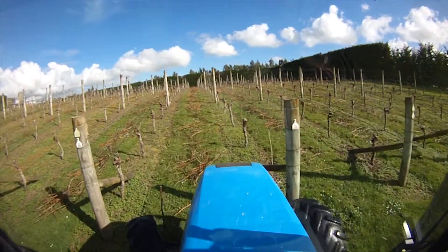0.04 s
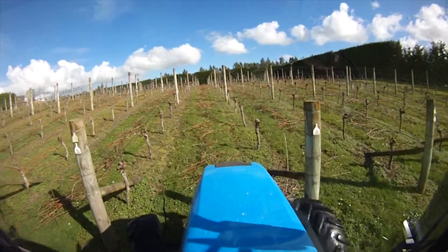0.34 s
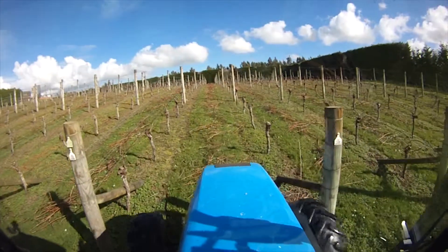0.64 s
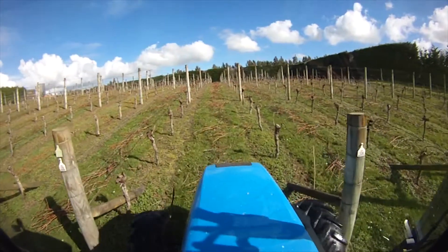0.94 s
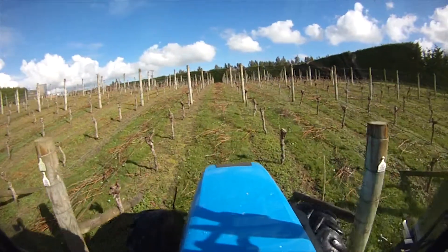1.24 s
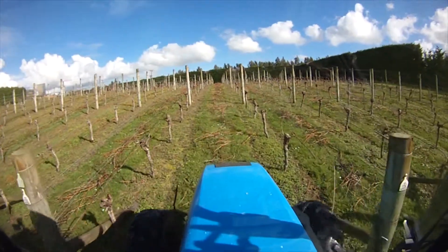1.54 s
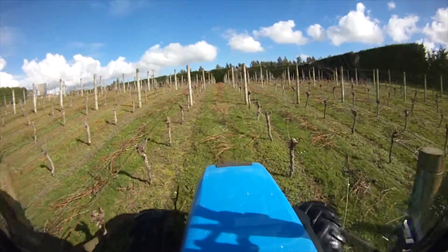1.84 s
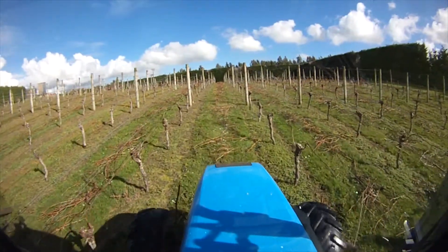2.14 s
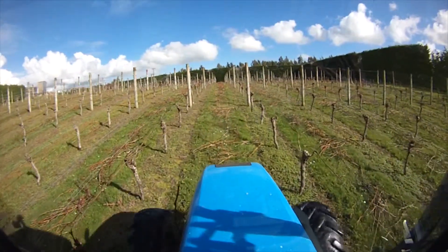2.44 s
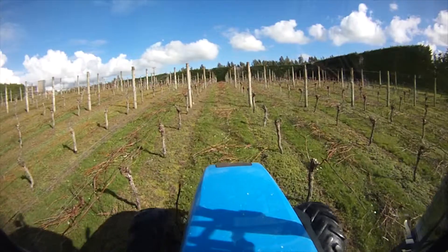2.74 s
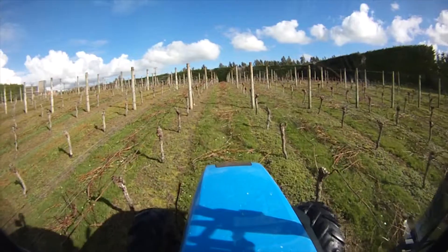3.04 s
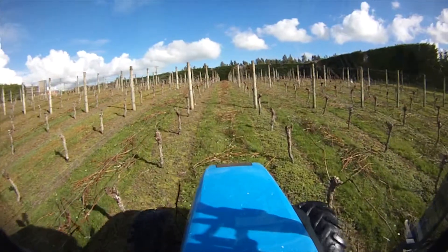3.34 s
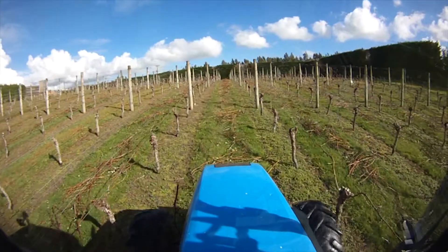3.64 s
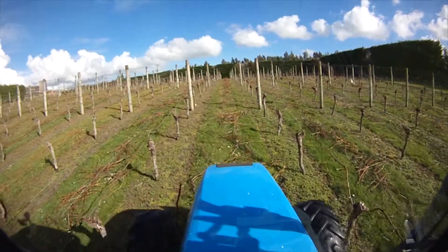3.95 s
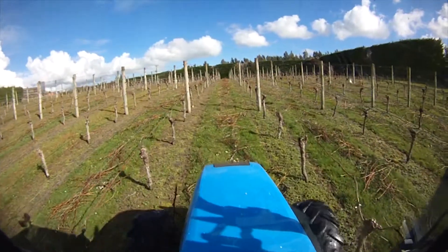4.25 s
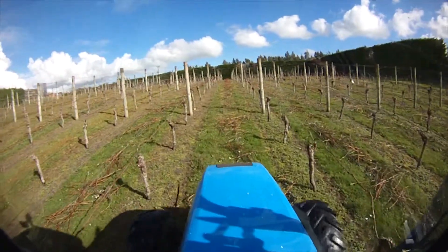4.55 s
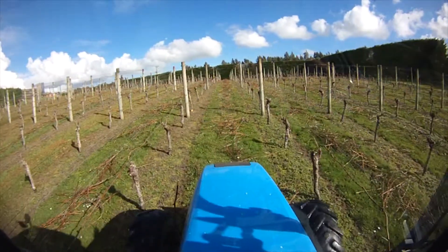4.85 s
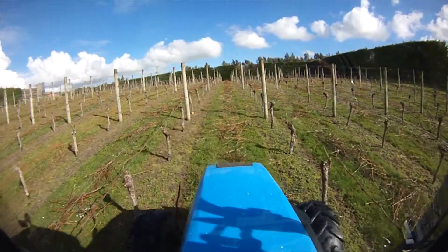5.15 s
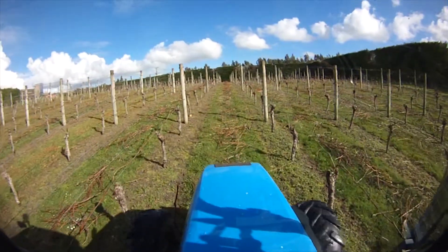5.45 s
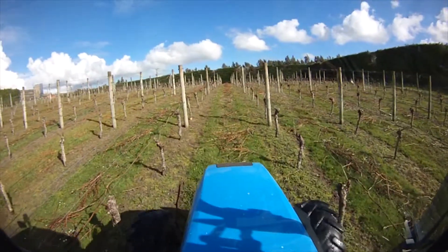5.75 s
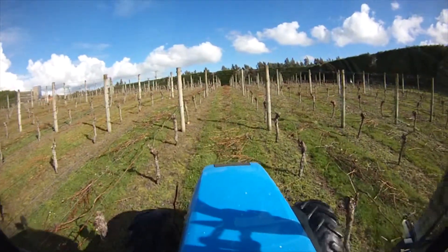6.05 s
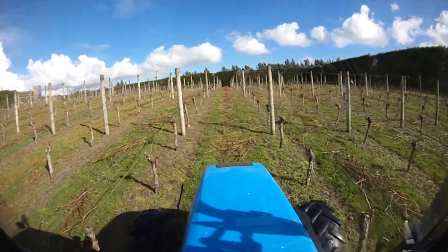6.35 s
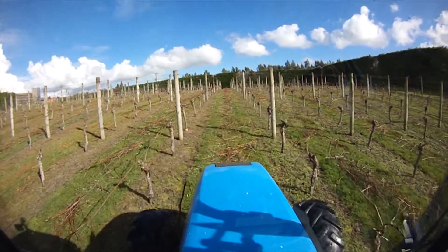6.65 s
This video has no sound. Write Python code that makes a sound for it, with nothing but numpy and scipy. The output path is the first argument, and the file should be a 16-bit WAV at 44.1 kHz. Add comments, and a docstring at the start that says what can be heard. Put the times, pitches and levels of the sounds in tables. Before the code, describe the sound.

A diesel tractor drones and roars steadily, heard from the seat, while a mulcher behind hums and shreds cuttings with occasional thumps and snaps.

```python
"""A diesel tractor drones and roars along a vineyard row, heard from the driver's seat.
Its four cylinders repeat one pattern of tones, with fan and gear tones in between.
Behind it a mulcher shreds cuttings with swinging blades (flails); its hum beats against the engine.
The roar rings the bodywork and swells as the flails bite; canes thump and twigs snap.
For the first three seconds the tractor steers into the row: gears whine and a panel buzzes more."""
import sys
import numpy as np
from scipy import signal
from scipy.fft import rfft, irfft
from scipy.io import wavfile

SR = 44100
rng = np.random.default_rng(int(sys.argv[2]) if len(sys.argv) > 2 else 0)


def master(y):
    """Save y as 16-bit WAV."""
    cut = np.clip(np.atleast_2d(y).T, -1, 1)
    pcm = np.round(cut * 32767)  # scale
    wavfile.write(sys.argv[1], SR, pcm.astype(np.int16))


N = 299439
TIME = np.arange(N) / SR
FREQ = np.fft.rfftfreq(N, 1 / SR)

# One engine cycle is two turns of the crank. An "order" is a multiple of the cycle rate.
# engine tones (order, base level [dB])
ENGINE_TONES = [(4, -56.5), (7, -48.5), (10, -53.5), (11, -49), (12, -43.5), (13, -41.5), (14, -44.5),
                (15, -33), (16, -49.5), (17, -55.5), (21, -62.5), (22, -60.5), (27, -57.5), (29, -64),
                (31, -58), (32, -43), (33, -67.5), (37, -65.5), (38, -58), (42, -61.5), (46, -65.5),
                (55, -70), (56, -63), (59, -66), (224, -94)]
# timing gear tones, around 24 teeth meeting per cycle (order, base level [dB])
GEAR_TONES = [(23, -58.5), (24, -40.5), (25, -49.5)]
# higher gear tones (order, level against the strongest [dB])
HIGH_GEAR_TONES = [(48, 0), (49, -8), (104, -13)]
# tone colour of the roar of engine and mulcher (frequency [Hz], base level [dB per Hz])
ROAR_COLOUR = [(15, -96), (40, -88), (70, -87.5), (112, -81), (142, -63), (200, -68), (335, -61),
               (395, -73.5), (710, -73.5), (790, -80.5), (1050, -82.2), (1400, -87), (2200, -91.2),
               (2900, -104.7), (5000, -125), (12000, -150)]
WHISTLE_ORDER = 64  # 16 times the firing rate


def undb(db):
    """Turn decibels into a gain."""
    return 10 ** (np.asarray(db) / 20)


def wander(rate_hz):
    """A smooth random wobble with a spread of 1, moving about rate_hz times a second."""
    wobble = irfft(rfft(rng.standard_normal(N)) / (1 + (FREQ / rate_hz) ** 4), N)
    return wobble / wobble.std()


def curve(table):
    """Join (time, value) points with straight lines."""
    return np.interp(TIME, *np.transpose(table))


def lows(sound, top_hz):
    """The part of a sound below top_hz."""
    return irfft(rfft(sound) / (1 + (FREQ / top_hz) ** 8), N)


def hold(end_s, release_s):
    """Stay at 1 until end_s, then fall to 0."""
    return np.clip(1 - (TIME - end_s) / release_s, 0, 1)


def step_up(start_s=1.468, attack_s=0.023):
    """The sound steps up suddenly near 1.5 s, holds, and eases back after 3.5 s (0 to 1)."""
    return np.clip((TIME - start_s) / attack_s, 0, 1) * hold(end_s=3.52, release_s=0.75)


def follow_db(swell_db, rest_db, share, steer_db):
    """A sound's level change: a share of the overall swell, plus a lift while the tractor steers."""
    return rest_db + share * swell_db + steer_db * hold(end_s=2.9, release_s=0.47)


def bites():
    """The flails bite into cuttings: brief swells in loudness, with rattle and hiss rising or dipping."""
    # (peak time [s], half-length [s], swell [dB], rattle change [dB], hiss change [dB])
    heaps = [(0.114, 0.17, 3, -1.5, 0.5), (1.557, 0.097, 2.1, 0, 0.5), (1.818, 0.13, 4, 10, -0.8),
             (2.44, 0.19, 4, 1, 1.5), (3.494, 0.11, 2, -6, 1), (4.608, 0.072, 4, 4, -0.5),
             (5.47, 0.1, 3, -4.5, 0), (6.179, 0.16, 2.5, -3, 0.5), (6.763, 0.092, 2.5, 16.5, 3.5)]
    bumps = np.array([np.exp(-((TIME - s) / length) ** 2) for s, length, *_ in heaps])
    return np.array(heaps)[:, 2:].T @ bumps


def through_body(sound, colour):
    """Give a sound a tone colour and the ring of the tractor's panels and pipes."""
    # peaks and dips of the bodywork (frequency [Hz], width [Hz], lift [dB])
    resonances = [(447, 16, 4.5), (507, 21, 6), (638, 37, -6), (710, 86, 4), (720, 39, 3), (870, 44, 5.5),
                  (1043, 7.2, -5.5), (1320, 94, 1.5), (1503, 110, 4.5), (2010, 38, 4), (2420, 58, -6.5),
                  (2756, 6.2, 13), (4110, 190, 5.5), (4790, 56, 6.5), (5300, 200, -1), (5480, 180, 4),
                  (6060, 120, 3), (6740, 120, 3.5), (8780, 77, 4)]
    hz, db = np.transpose(colour)
    gain_db = np.interp(np.log(FREQ + 1), np.log(hz), db)
    for centre, width, lift in resonances:
        gain_db = gain_db + lift / (1 + (2 * (FREQ - centre) / width) ** 2)
    return irfft(rfft(sound / sound.std()) * undb(gain_db), N) * np.sqrt(SR / 2)


def shaft_tones(turns, tones, level_db):
    """Tones at multiples of a shaft's speed, each wavering by about 1 dB on its own."""
    return sum(undb(db + level_db + wander(1.9)) * np.cos(2 * np.pi * (order * turns + rng.random()))
               for order, db in tones)


def steering_pump(cycle, swell_db):
    """The steering pump sings louder while the wheels are turned."""
    # (order, base level [dB])
    tones = [(62.17, -65), (63.086, -63), (65, -65), (65.82, -60), (69, -65)]
    return shaft_tones(cycle, tones, follow_db(swell_db, rest_db=-11, share=0.42, steer_db=10.4))


def whistle(cycle):
    """A thin whistle whose pitch follows the engine speed."""
    # (time [s], level [dB])
    levels = [(0, -58), (1.2, -59), (1.7, -62), (2.1, -65.5), (3.05, -55.5), (3.5, -65), (4.3, -61.5),
              (6.6, -61), (6.76, -61)]
    return undb(curve(levels)) * np.cos(2 * np.pi * WHISTLE_ORDER * cycle)


def loose_panel(cycle, swell_db, rattle_db, ring_hz=1390, width_hz=65):
    """A loose panel is jolted once a cycle and buzzes."""
    jolts = rng.standard_normal(N) * (1 + 0.093 * np.cos(2 * np.pi * cycle)) ** 2
    ring = irfft(rfft(jolts) / (1 + (2 * (FREQ - ring_hz) / width_hz) ** 4), N)
    buzz_db = follow_db(swell_db, rest_db=-70, share=0.1, steer_db=7.2)
    return ring / ring.std() * undb(buzz_db + rattle_db)


def transmission(cycle, swell_db):
    """The drive to the wheels whines, more so while steering."""
    # (order, base level [dB])
    tones = [(26.248, -65), (31.088, -55), (31.542, -63), (32.459, -59), (32.91, -59), (33.824, -60),
             (52.495, -68)]
    return shaft_tones(cycle, tones, follow_db(swell_db, rest_db=-5.5, share=0.82, steer_db=6.2))


def fan(cycle, swell_db, turns_per_cycle=2.4345):
    """The cooling fan hums, driven by a belt from the engine."""
    # (multiple of the fan's turn rate, base level [dB])
    tones = [(4, -60), (5, -59), (8, -61), (9, -56), (10, -52), (11, -63), (12, -58), (14, -53.5)]
    level_db = follow_db(swell_db, rest_db=-2.7, share=0.76, steer_db=1.2)
    return shaft_tones(turns_per_cycle * cycle, tones, level_db)


def gears(cycle):
    """Gear teeth sing as they meet; the whine grows when the wheels push harder."""
    # main whine (time [s], level change [dB])
    whine = [(0, -2), (1.2, -0.5), (1.7, 4.8), (2.05, 0), (2.25, 3.5), (2.47, 6.5), (2.75, 3), (3.1, 0),
             (3.6, 0), (4.25, -6.5), (5.3, -8), (6.05, -3), (6.79, -12)]
    # higher tones (time [s], level [dB])
    high_whine = [(0, -55.5), (.6, -61), (1.3, -60), (1.9, -57), (2.25, -51), (2.6, -49.5), (3.3, -53),
                  (3.9, -60), (5.3, -60.5), (6.79, -70)]
    groups = (GEAR_TONES, curve(whine)), (HIGH_GEAR_TONES, curve(high_whine))
    return sum(undb(db + level_db) * np.cos(2 * np.pi * order * cycle)
               for tones, level_db in groups for order, db in tones)


def clatter(cycle, roar_db, size=2048):
    """Valves and injectors repeat one knock pattern each cycle: faint tones between the strong ones."""
    orders = np.exp(2j * np.pi * rng.random(size // 2 + 1))  # equal strength, random phase
    taken = [order for order, _ in ENGINE_TONES + GEAR_TONES + HIGH_GEAR_TONES] + [WHISTLE_ORDER]
    orders[:18] = 0  # no bass
    orders[taken] = 0
    pattern = irfft(orders, size)
    knocks = np.interp(cycle % 1, np.arange(size) / size, pattern, period=1)
    return through_body(knocks, ROAR_COLOUR) * undb(-6 + 0.93 * roar_db)


def twigs():
    """Dry twigs crack; thicker sticks crunch lower and longer."""
    # (time [s], base level [dB], decay [s], bottom of the band [Hz], top of the band [Hz])
    snaps = [(.831, -63, .004, 3300, 9000), (.988, -50, .018, 1500, 2400), (1.80, -57, .035, 2500, 6000),
             (2.870, -57, .005, 3000, 10000), (2.880, -57.5, .006, 3200, 5500),
             (3.077, -63, .004, 5500, 8500), (3.101, -62, .005, 4500, 8500), (3.51, -65, .008, 3300, 7000),
             (3.76, -66, .02, 3300, 6500), (5.338, -67, .006, 3300, 8000), (5.81, -56, .04, 1400, 2200)]
    out = 0
    for s, db, decay_s, low_hz, high_hz in snaps:
        burst = undb(db) * (TIME >= s) * np.exp(-np.abs(TIME - s) / decay_s)
        band = signal.butter(3, [low_hz, high_hz], "band", fs=SR, output="sos")
        band_gain = np.sqrt(SR / 2 / (high_hz - low_hz)) / 2  # makes up for a narrow band
        out = out + signal.sosfilt(band, burst * rng.standard_normal(N)) * band_gain
    return out


def canes(decay_s=0.01, top_hz=620):
    """Thick canes are flung against the mulcher's hood and jolt the bodywork with a dull thump."""
    # (time [s], peak against the roar's base level [dB])
    hits = [(1.483, 7.5), (1.714, 7), (1.76, 8.5), (1.814, 9), (1.851, 6.5), (2.46, 6.5), (2.555, 3.5),
            (3.46, 4), (4.635, 6), (5.337, 7.5), (5.383, 3), (6.042, 4.5), (6.13, 6)]
    bursts = sum(undb(db) * (TIME >= s) * np.exp(-np.abs(TIME - s) / decay_s) for s, db in hits)
    jolts = rng.standard_normal(N) * bursts
    return lows(through_body(jolts, ROAR_COLOUR), top_hz) * jolts.std()


def shredding(cycle, turns, roar_db, hiss_db):
    """Countless tiny hits of cuttings blur into a hiss that shakes with the engine and the rotor."""
    # (frequency [Hz], base level [dB per Hz])
    hiss_colour = [(1000, -130), (3000, -111), (4500, -113), (6300, -113), (8500, -118), (10000, -125),
                   (12500, -131)]
    feed_db = -0.5 + hiss_db + 0.5 * wander(5.5)  # cuttings flow in unevenly
    grains = rng.standard_normal(N) * undb(1.5 * np.minimum(rng.exponential(size=N), 6))
    shaking = 1 + 0.12 * np.cos(2 * np.pi * cycle) + 0.06 * np.cos(2 * np.pi * turns)
    return through_body(grains * shaking, hiss_colour) * undb(0.8 * roar_db + feed_db)


def rotor(turns, flail_rows=4):
    """Rows of flails beat the air and hum; the unbalanced rotor shakes the frame once a turn."""
    # the hum, its octave and the shake, each (time [s], base level [dB])
    hum_levels = [(0.0, -34), (1.05, -42), (1.8, -32.5), (2.5, -29.5), (3.0, -34), (3.6, -33.5),
                  (4.3, -37.5), (6.79, -36.5)]
    octave_levels = [(0, -53.5), (1.7, -54.5), (2.2, -42), (2.7, -53.5), (3.35, -57.5), (4.1, -49),
                     (4.9, -45), (6.2, -43.5), (6.79, -56)]
    shake_levels = [(0.0, -52.5), (0.36, -51), (2.08, -56), (2.27, -64), (2.78, -55), (3.19, -68),
                    (3.48, -53.5), (6.73, -53), (6.79, -60)]
    hum = undb(curve(hum_levels) - 1.3) * np.cos(2 * np.pi * flail_rows * turns)
    octave = undb(curve(octave_levels)) * np.cos(4 * np.pi * flail_rows * turns)
    shake_db = curve(shake_levels)
    shake = undb(shake_db - shake_db.mean() - 52) * np.sin(2 * np.pi * turns)
    return (octave - hum) * (1 + 0.043 * wander(17)) + shake


def roar(cycle, roar_db, cylinders=4):
    """Rushing noise pulses with each firing; its bass chugs with the strongest cylinder."""
    pulses = 1 + 0.07 * np.cos(2 * np.pi * cylinders * cycle)
    noise = through_body(rng.standard_normal(N) * pulses, ROAR_COLOUR)
    bass = lows(noise, top_hz=420)
    chug = np.cos(2 * np.pi * cycle) * (0.2 * bass + 0.1 * (noise - bass))
    return (noise + chug) * undb(0.92 * roar_db - 1.5)


def engine(cycle, swell_db, silencer_order=15, surge_order=7):
    """Unequal cylinders repeat once a cycle: low tones boom and higher ones drone."""
    boom_db = follow_db(swell_db, rest_db=-4.5, share=0.97, steer_db=0.39)
    drone_db = follow_db(swell_db, rest_db=-1, share=1.13, steer_db=0.36)
    surge_db = 9 * np.exp(-((TIME - 2.02) / 0.25) ** 2)  # one low tone booms out near 2 s
    silencer_lag = 0.65 + 0.65 * step_up()  # radians; more lag evens out the chugging
    out = 0
    for order, db in ENGINE_TONES:
        change_db = boom_db + surge_db * (order == surge_order) if order < 20 else drone_db
        # the silencer delays the tone it rings at and smears distant tones over the cycle
        lag = silencer_lag if order == silencer_order else ((order - silencer_order) / 3) ** 4
        gain = undb(db + change_db + 0.9 * wander(0.77))
        out = out + gain * np.cos(2 * np.pi * order * cycle - lag)
    return out * (1 + 0.11 * wander(16))  # no two cycles burn equally hard


def scene(in_step_s=5.485, rotor_turns_per_cycle=1.9378, throb_hz=2.8):
    """Engine, fan and mulcher turn together at nearly steady speed while their levels swell and ease."""
    # (time [s], engine speed [cycles per second])
    speed = [(0, 21.377), (.4, 21.438), (1.4, 21.552), (1.9, 21.541), (2.4, 21.581), (2.9, 21.571),
             (3.4, 21.593), (4, 21.493), (4.7, 21.444), (5.4, 21.456), (6.1, 21.441), (6.79, 21.378)]
    cycle = np.cumsum(curve(speed) * (1 + 0.0003 * wander(6.4))) / SR  # counts engine cycles
    cycle -= np.interp(in_step_s, TIME, cycle)  # strongest cylinder and rotor beat line up here
    turns = rotor_turns_per_cycle * cycle
    bite_db, rattle_db, hiss_db = bites()
    throb_db = 0.36 * np.cos(2 * np.pi * throb_hz * (TIME - 4.62))
    swell_db = 3.5 * step_up() + bite_db + throb_db
    roar_db = follow_db(swell_db, rest_db=-3, share=0.83, steer_db=3.2)
    exhaust = engine(cycle, swell_db) + roar(cycle, roar_db)
    shafts = gears(cycle) + fan(cycle, swell_db) + transmission(cycle, swell_db)
    whistles = whistle(cycle) + steering_pump(cycle, swell_db)
    rattles = clatter(cycle, roar_db) + loose_panel(cycle, swell_db, rattle_db)
    mulcher = rotor(turns) + shredding(cycle, turns, roar_db, hiss_db) + twigs() + canes()
    return (exhaust + shafts + whistles + rattles + mulcher)[None]


def record(dry, top_hz=12800, fade_s=0.004):
    """Cut the highest treble and fade out so the sound ends without a click."""
    treble_cut = signal.ellip(8, 0.2, 70, top_hz, fs=SR, output="sos")
    fade = np.clip((TIME[-1] - TIME) / fade_s, 0, 1)
    return signal.sosfilt(treble_cut, dry) * fade


dry = scene()
out = record(dry)
master(out)
```